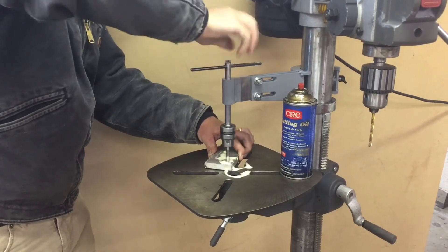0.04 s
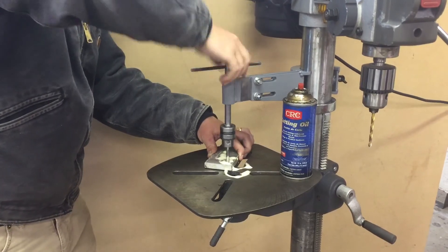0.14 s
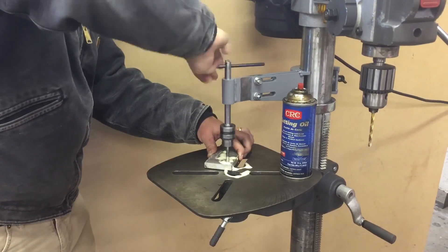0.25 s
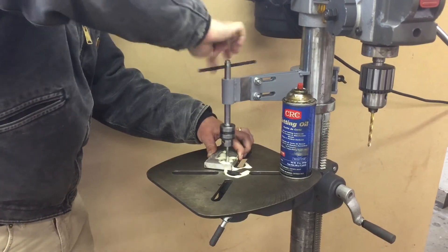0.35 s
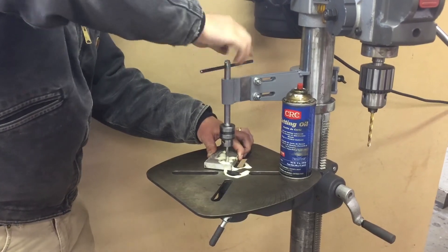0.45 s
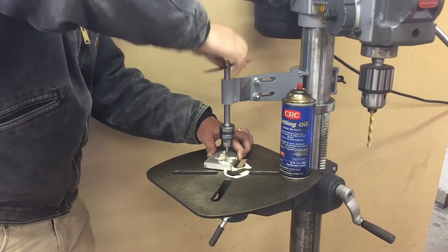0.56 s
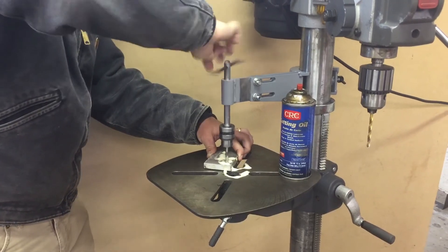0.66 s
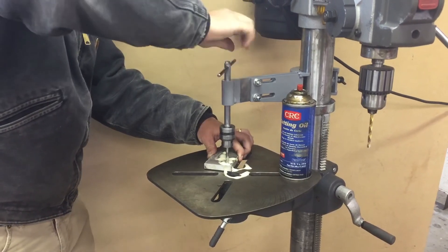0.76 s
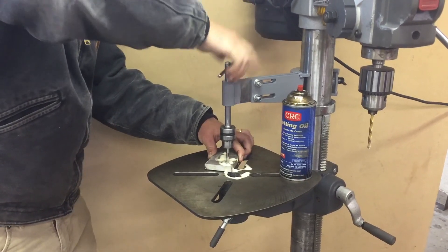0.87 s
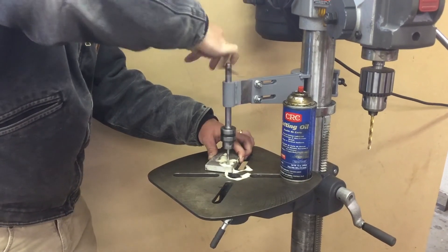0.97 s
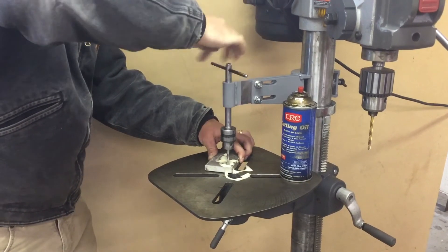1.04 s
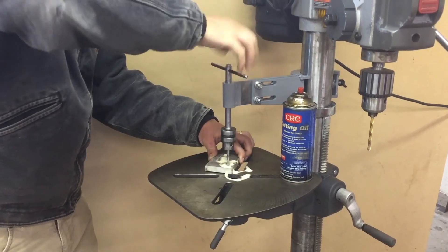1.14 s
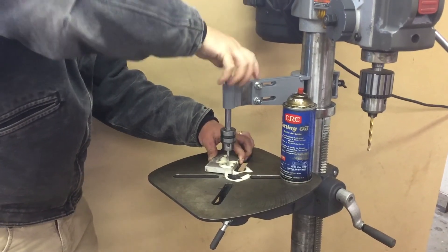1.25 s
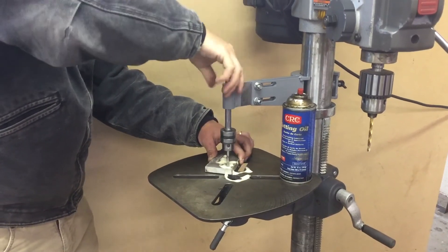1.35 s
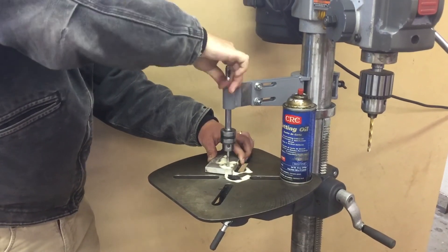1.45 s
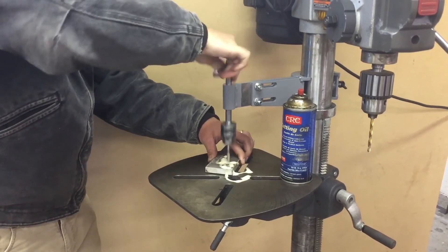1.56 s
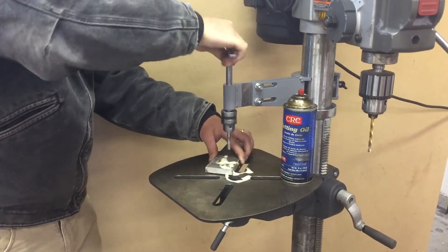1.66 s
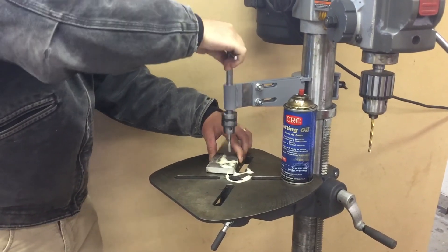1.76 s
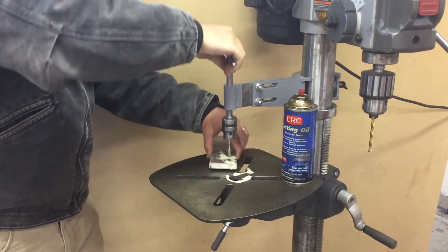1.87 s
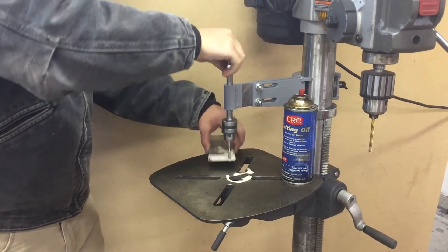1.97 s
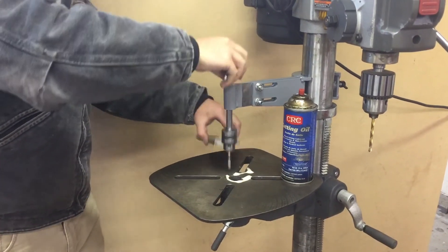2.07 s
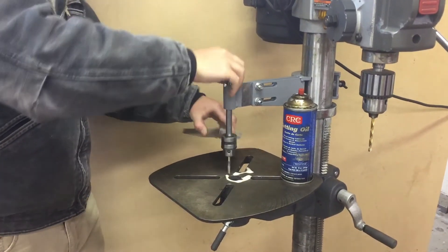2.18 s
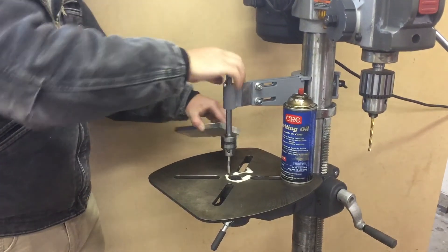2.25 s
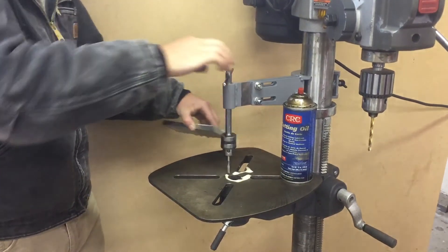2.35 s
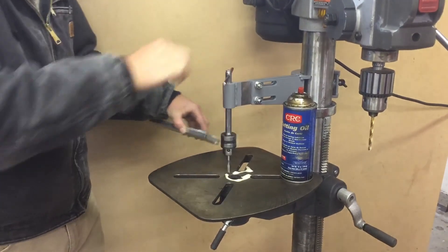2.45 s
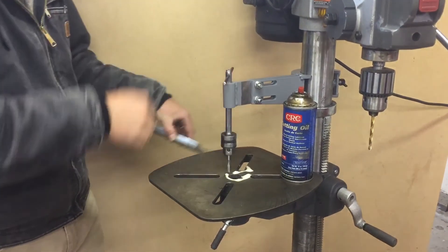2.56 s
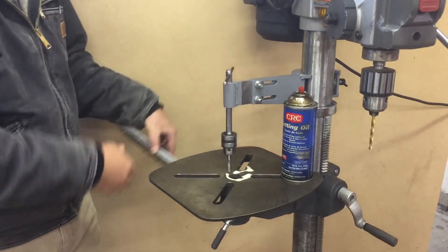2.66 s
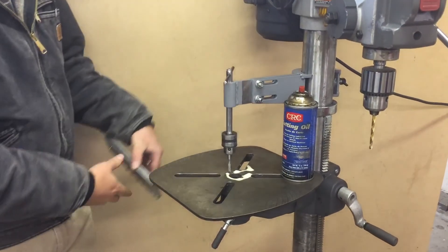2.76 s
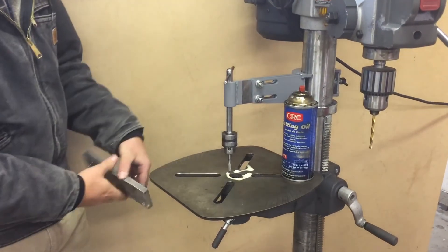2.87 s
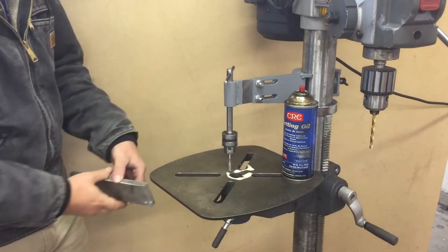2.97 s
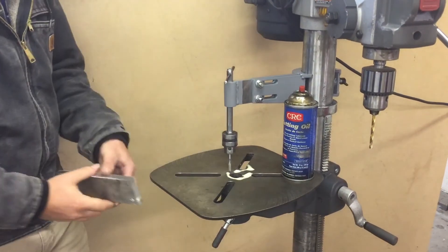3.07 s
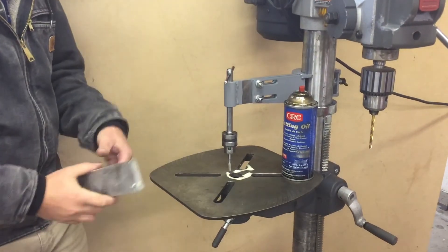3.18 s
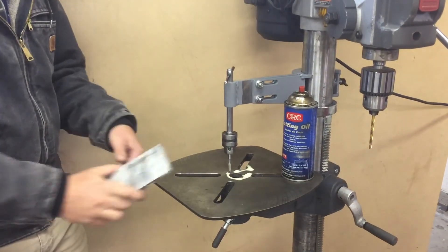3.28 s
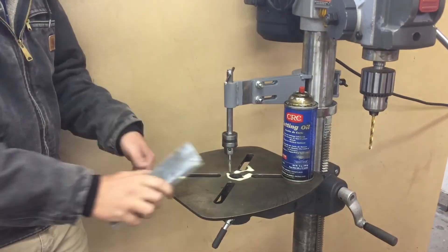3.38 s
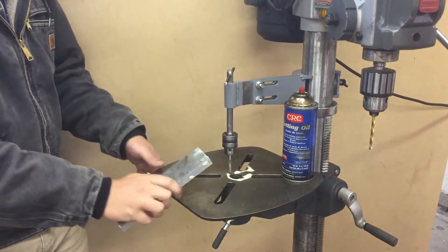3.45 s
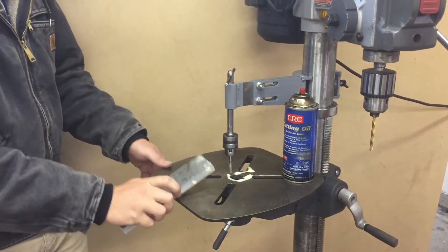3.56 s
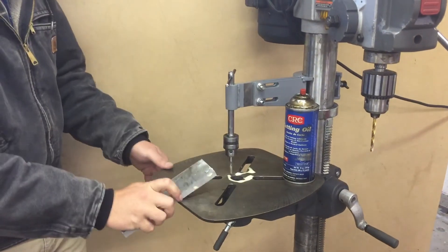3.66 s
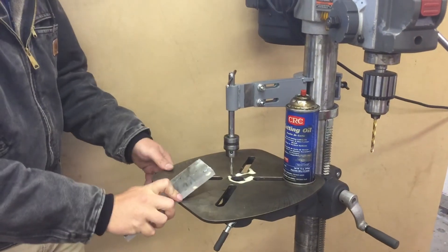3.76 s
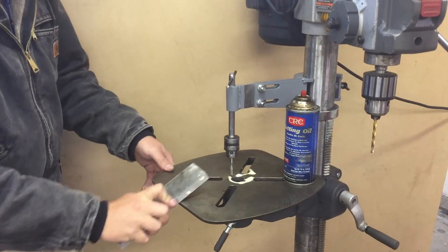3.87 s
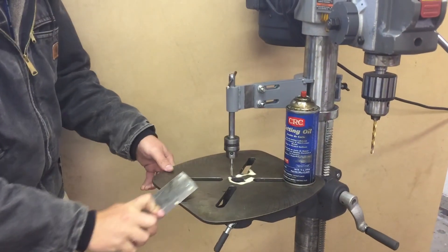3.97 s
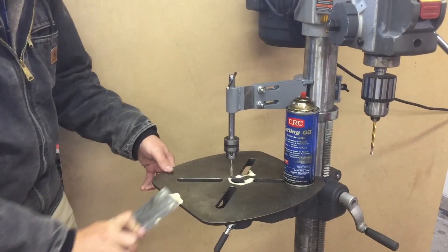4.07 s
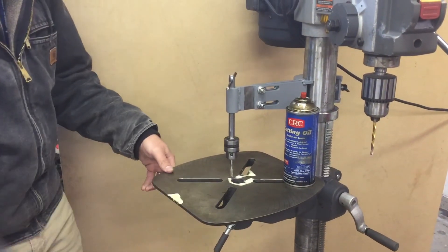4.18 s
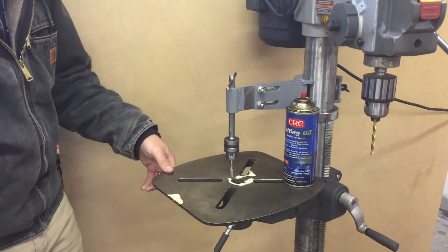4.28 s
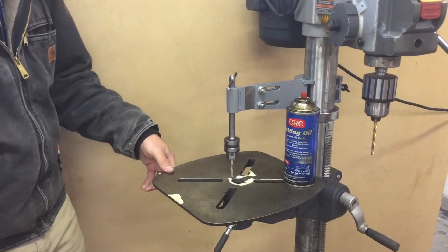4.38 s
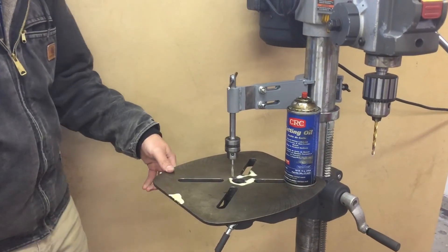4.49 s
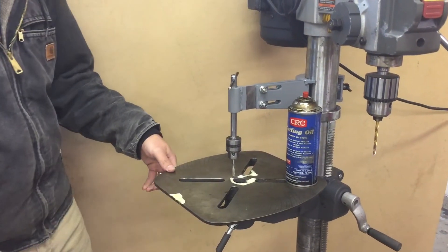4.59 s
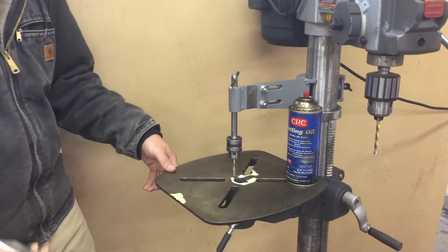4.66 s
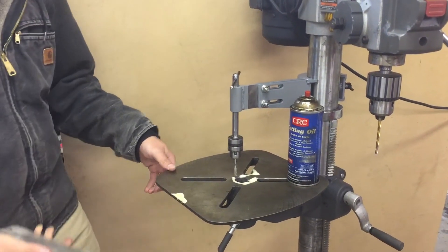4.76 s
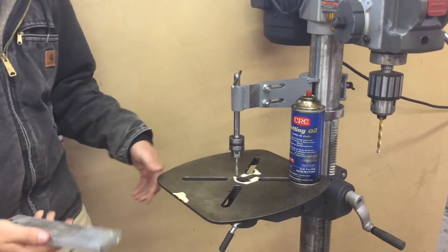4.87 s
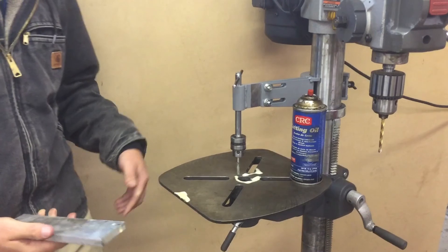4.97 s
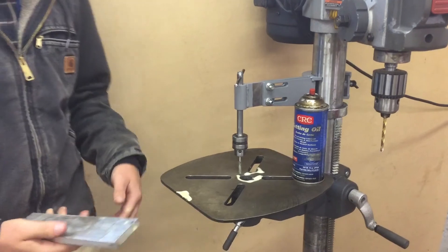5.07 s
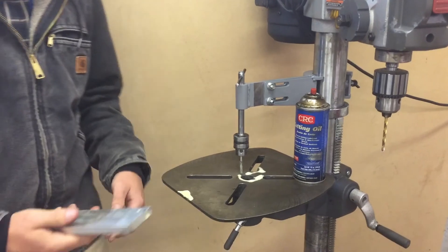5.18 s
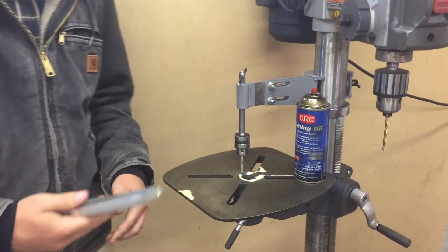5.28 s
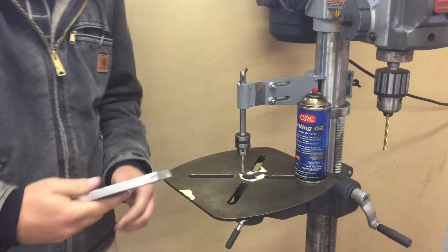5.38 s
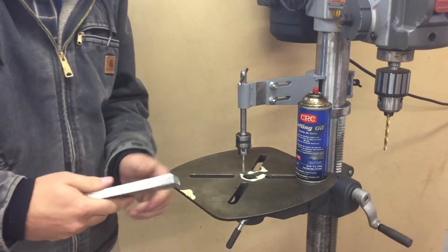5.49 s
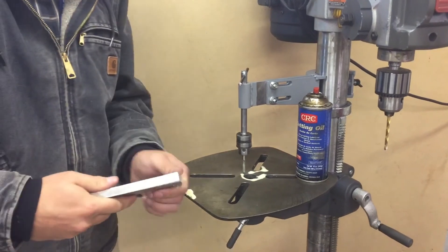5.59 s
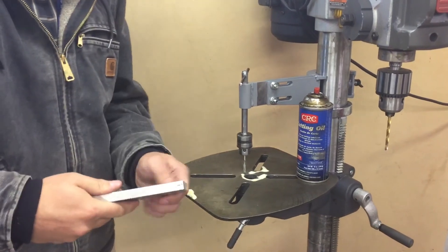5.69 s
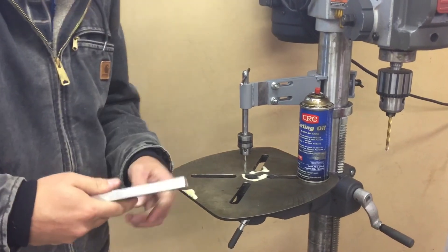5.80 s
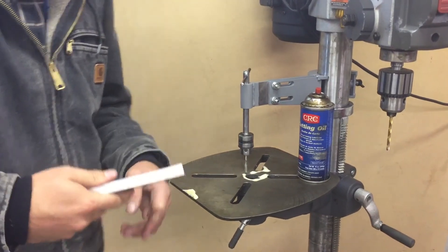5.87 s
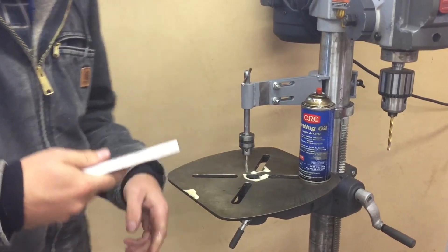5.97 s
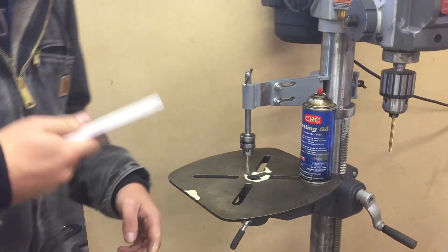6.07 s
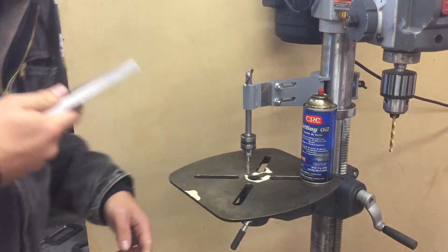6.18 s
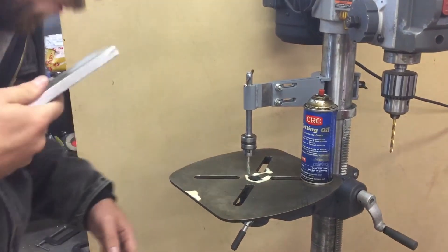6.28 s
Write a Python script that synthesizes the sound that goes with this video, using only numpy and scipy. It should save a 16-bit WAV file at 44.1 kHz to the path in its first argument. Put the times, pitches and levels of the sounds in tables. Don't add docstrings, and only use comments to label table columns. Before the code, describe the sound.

In a small hard workshop with faint low hum, a hand tap turns out of an aluminium plate in short gritty rasps. The tap guide clacks hard in a quick cluster, and the plate knocks the steel table. After quiet handling, its edge drops with a bright bouncing clatter and scrapes strongly. Soft palm rubs and small knocks finish it. One camera microphone, fairly close.

```python
import sys
import numpy as np
from scipy import signal
from scipy.fft import rfft, irfft
from scipy.io import wavfile
from scipy.ndimage import uniform_filter1d

SR = 44100
rng = np.random.default_rng(int(sys.argv[2]) if len(sys.argv) > 2 else 0)


def ratio_of_db(decibels):
    return 10 ** (np.asarray(decibels, float) / 20)


def dump_mix(stems):
    frames = np.atleast_2d(stems).T
    limited = np.clip(frames, -1, 1)
    pcm = np.round(limited * 32767).astype(np.int16)
    wavfile.write(sys.argv[1], SR, pcm)


N = 279278

# full contact in seconds, rise in seconds, hold in seconds,
# effort in dB, brightness in dB.
TURNS = [
    (.276, 0.05, 0.016, -35.5, 5.5),
    (.615, 0.003, 0.083, -38, -8),
    (.68, 0.13, 0.035, -50.5, 14.5),
    (.984, .025, 0.032, -46, 0.5),
    (1.03, 0.07, .025, -43, 4),
    (1.056, 0.02, 0.048, -44, -13),
    (1.589, .012, .01, -51, 0),
    (1.62, 0.045, 0.06, -31.5, 9),
    (1.685, .04, .033, -42.5, 6),
]
SLIDES = [
    (1.762, .004, .006, -33, 4),
    (2.195, 0.29, 0.013, -44.5, -12),
    (3.664, 0.03, 0.018, -53, -6),
    (3.96, 0.14, 0.06, -26, 0),
    (4.04, 0.047, 0.16, -26, 0.5),
]
COASTS = [
    (1.786, 0.0078, 0.13, -43, 6.5),
    (2.07, 0.026, 0.09, -50, -15),
    (3.73, .004, 0.37, -55, 10),
]
RUBS = [(2.892, 0.114, 0.0012, -63.5, 3), (3.074, 0.31, 0.063, -51.5, -2.5),
        (3.148, 0.27, 0.0066, -50.5, 0), (4.794, 0.024, 0.023, -64.5, 4), (5.087, 0.01, 0.022, -54, 3),
        (5.121, 0.079, 0.0034, -45.5, -1.5), (5.785, 0.046, 0.0622, -68, 15),
        (5.875, 0.18, 0.049, -55, 5.5), (5.955, 0.011, 0.011, -60.5, 0), (6.235, .03, .02, -67.5, 6),
        (6.272, 0.085, 0.011, -45.5, 2.5), (6.33, 0.092, .004, -32.5, 0.5)]
BRUSHES = [
    (2.466, 0.051, 0.27, -58, -17),
    (2.712, 0.046, 0.09, -68, 1),
    (5.574, 0.64, 0.0052, -56.5, 1.5),
]
# rise in dB, sag in dB per second while held, release in dB per
# second, weight (bass) in dB, weight gained in dB per dB of lost effort.
TURNING = (29.5, 136, 549, -6, 1.1442)
SLIDING = (30.5, 5, 909.5, -19.5, 0.5)
COASTING = (40, 42.5, 211, -5, 0.9052)
RUBBING = (41.5, 2, 698, 0.5, -0.09)
BRUSHING = (32.3, 37, 98, 5.5, 0.09)

# pitch in Hz, width in Hz, level in dB.
TAP = [(71, -59.5), (120, -45), (157, -33.5), (231, -15.5), (605, -5), (670, -12), (874, -19), (1090, -13),
       (2380, -7), (6110, -30), (16000, -59.5)]
TAP_PEAKS = [(165, 40, -6), (673, 60, -1), (1100, 190, -9), (1850, 200, -4), (2100, 120, -5),
             (2900, 200, -4), (3880, 250, -10), (4410, 150, -15)]
TABLE = [(71, -73.5), (120, -19.5), (483, 4), (535, -2), (930, -6.5), (1900, -7), (2640, -13), (2870, -8.5),
         (4880, -16.5), (13600, -39.5), (16000, -40.5)]
TABLE_PEAKS = [(931, 200, -6), (1480, 40, -9), (1700, 90, -8), (1880, 55, -2), (2450, 70, -5),
               (2790, 45, -5), (3270, 70, -7), (4410, 80, -15), (5100, 34, -15), (5300, 48, -11),
               (5980, 90, -16), (6910, 28, -20), (8120, 40, -21), (8480, 90, -19)]
SKIN = [(120, -94), (200, -10.5), (509, -8), (659, -3.5), (1270, -6.5), (1770, -2), (2960, -6),
        (3430, -3.5), (10500, -17), (15100, -21), (16000, -16)]
SKIN_PEAKS = [(660, 160, -10), (1800, 250, -11), (3440, 300, -11)]
# start in seconds, end in seconds, from Hz, to Hz, dB over the stroke.
SINGS = [(3.905, 3.99, 3480, 3400, -3), (3.92, 4.02, 1870, 1870, -5), (3.985, 4.085, 1720, 1450, -4),
         (4.035, 4.115, 2800, 2790, -6), (4.065, 4.185, 3350, 3050, -3), (4.0, 4.1, 2480, 2480, -9),
         (4.03, 4.105, 1000, 1250, -9), (4.125, 4.165, 1890, 1890, -2), (4.12, 4.235, 4600, 4250, -2),
         (3.94, 4.03, 520, 450, -7), (4.15, 4.21, 560, 420, -6)]
PALM_HOLLOWS = [
    (3.001, 3.202, 3000, 2416, -22),
    (5.045, 5.133, 1500, 750, 3),
    (5.78, 5.85, 1900, 1650, 4),
    (5.78, 5.84, 3150, 2950, 3),
    (5.83, 5.935, 2200, 1350, 4),
    (5.84, 5.93, 900, 600, 5),
    (5.875, 5.925, 2400, 3300, 1),
    (6.255, 6.34, 600, 1100, 4),
]

# start in seconds, crack in dB, contact chatter in seconds, ring in dB over the crack.
CLACKS = [(1.0235, -29, 0.003, 3), (1.0554, -39, .004, 1.5), (1.6192, -28, .006, -6.5),
          (1.7185, -8.5, 0.003, -14), (1.72, -7, 0.004, -6), (1.7248, -7.5, 0.004, -3),
          (1.733, -13, .005, -14.5), (1.7444, -23, 0.004, -3.5), (1.755, -19.5, .004, 4.5),
          (1.763, -22.5, .004, -11.5), (1.808, -33, .005, -4)]
RATTLES = [
    (1.7178, -9, 0.004, .1),
    (1.761, -46.5, .006, 3.6),
    (1.79, -42, .006, 6.1),
    (1.881, -42, 0.012, 5),
    (1.894, -42, 0.012, 5),
]
STEEL_HITS = [
    (1.72, -33, 0.0014, 3.4),
    (1.8811, -42, .004, 9.2),
    (1.8931, -40, 0.0051, 11.5),
    (3.7, -31, .002, 14),
    (4.195, -33.5, 0.0029, 1),
]
KNOCKS = [
    (.615, -46, 0.017, 7),
    (2.2045, -21, 0.012, 14),
    (2.212, -12, 0.015, -21),
    (2.222, -13, 0.0088, 0),
    (2.236, -18, 0.011, -2.5),
    (5.086, -52, 0.0042, 17),
    (5.117, -47.5, 0.0077, 5),
    (6.2635, -34.5, 0.0078, -14),
    (6.321, -26.5, 0.016, 7.5),
]
DROPS = [
    (3.6845, -9.5, 0.012, -6.5),
    (3.693, -8, 0.008, 3),
    (3.701, -7, 0.006, -2),
    (3.711, -17.5, 0.0041, -2.5),
    (3.732, -28, .004, -3),
    (3.747, -26.5, .004, -4),
]
SNAGS = [(.2498, -44, .003, -10), (.2563, -40, .003, -10), (.2618, -36, .004, -10), (.2733, -29, .003, -10),
         (.2855, -31, .003, -10), (.291, -31, .003, -10), (.3, -31, .002, -10), (.9662, -48, .004, -5),
         (.9841, -44, .003, -10), (.9931, -38, .003, -10), (3.9248, -30, .004, -10),
         (3.9457, -26, .004, -10)]

# pitch in Hz, level in dB, fade by 60 dB in seconds.
GUIDE = [(377, -13, .4), (571, -14, .3), (818, -16, .39), (1157, -13, .28), (1992, -18, .4),
         (2083, -13, .17), (2239, -6, .07), (2988, -8, .17), (3117, -8, .22), (3440, -13, .4),
         (3800, -6, .1), (4274, -9, .22), (5329, -18, .2)]
HANDLE = [(3450, -6, .3), (4400, -4, .15), (6250, -7, .15), (8500, -8, .12), (9808, -6, .2),
          (10750, -6, .24), (12100, -14, .1), (13840, -10, .1)]
STEEL = [(668, -3, .45), (1593, -8, .6), (1712, -6, .45), (1880, -4, .5), (2510, -9, .35), (2789, -4, .3),
         (3445, -4, .45), (4312, -15, .5), (4380, -15, .4)]
PLATE = [(296, -14, 0.4), (554, -4, 0.3), (668, -3, 0.3), (860, -3, 0.25), (942, -14, .2), (1195, -5, 0.22),
         (1513, -6, 0.55), (1798, 2, 0.32), (1879, -13, 0.35), (2094, -8, 0.2), (2476, -9, 0.23),
         (2785, -3, 0.28), (2891, -8, 0.2), (2982, -16, 0.3)]
EDGE = [(377, -22, .6), (619, -15, .6), (1217, -8, .2), (1577, -13, .6), (1685, -3, .12), (1852, -8, .4),
        (2510, -10, .5), (2810, -2, .3), (2993, -10, .5), (3461, -4, .25), (4307, -3, .3), (5206, -14, .3),
        (6293, -14, .25), (8150, -20, .3)]
# pitch in Hz, level in dB per Hz.
GUIDE_CRACK = [(88, -38.5), (150, -13), (570, -10.5), (2250, -1.5), (2740, -1), (3750, 0.5), (6130, -6),
               (7920, -14.5), (11100, -13), (14300, -16.5), (16400, -40.5)]
PLATE_CRACK = [(88, -38), (150, -14), (400, -6), (913, 1), (1820, -3.5), (2040, -7.5), (2850, -5),
               (4940, -17.5), (13700, -31), (15400, -28.5), (16400, -67)]
EDGE_CRACK = [(88, -70), (150, -27), (1070, -13.5), (1220, -3), (1460, -25), (1680, 1), (2200, -13),
              (2800, -1), (3150, -11), (3470, 0), (3900, -19), (4390, -8), (4850, -24), (8400, -27),
              (15100, -52), (16400, -74.5)]
SNAG_CRACK = [(300, -40), (1300, -18), (1900, 0), (2400, -5), (2900, 0), (3400, -6), (3900, -2),
              (5000, -16), (16000, -40)]

# start in seconds, peak in dB, pitch
# in Hz, width in Hz, fade by 60 dB in seconds.
TICKS = [(0, -53, 480, 300, 0.31), (4.2, -28.5, 653, 120, 0.15), (2.141, -40.5, 515, 330, 0.28),
         (.281, -36.5, 664.6, 35, 0.27), (.73, -51, 640, 220, .5), (.96, -48.5, 604, 380, 0.49),
         (1.08, -56, 657, 100, 0.58), (1.881, -39, 4400, 274, 0.096), (1.893, -41, 4316, 350, .07),
         (4.2, -36, 491, 90, 0.14), (1.735, -32.5, 477, 450, 0.14), (0.479, -55, 1060, 60, 0.08),
         (.614, -30, 1990, 160, 0.07), (.63, -42, 3000, 350, .12), (.262, -38, 2000, 200, .1),
         (1.024, -36, 6300, 500, 0.09), (1.0235, -36, 7000, 6000, .02), (1.3, -58.5, 680, 20, 0.48),
         (1.601, -46, 393, 78, 0.9), (1.62, -39, 7830, 3500, 0.053), (1.895, -47, 14000, 200, 0.09),
         (2.06, -49, 663, 75, 0.44), (2.845, -63, 4520, 80, 0.25), (2.888, -52, 12170, 7100, 0.022),
         (3.612, -54, 1614, 82, 0.068), (3.613, -65.5, 4380, 92, 0.071), (5.086, -46, 620, 150, 0.08),
         (5.108, -42, 850, 300, .08), (5.12, -47, 670, 60, .15), (2.243, -29, 1798, 30, .2),
         (2.21, -27, 556, 60, .25), (2.225, -24, 1150, 100, .08), (5.87, -52, 750, 300, .15),
         (1.15, -55, 380, 120, .4), (1.73, -37.5, 277.1, 110, 0.4), (1.8, -37, 518, 330, 0.3),
         (2.111, -47, 1243, 250, 0.29), (.275, -53, 8700, 770, 0.11), (.67, -56, 8700, 710, 0.11),
         (6.13, -52, 9020, 1960, 0.055), (4.791, -46, 3950, 5000, 0.042), (5.766, -49, 11000, 8000, 0.081),
         (5.955, -38, 1682, 3500, 0.043), (6.234, -46, 5490, 6000, 0.058)]
# start in seconds, stopped at seconds, pitch in Hz, level in dB.
STOPPED = [(5.13, 5.245, 670, -52), (2.25, 2.405, 672, -37), (2.32, 2.46, 1880, -48),
           (1.89, 2.01, 1593, -54), (1.9, 2.03, 668, -47), (.28, .31, 680, -38), (3.73, 3.86, 1712, -39),
           (3.74, 3.94, 3445, -45), (3.75, 3.88, 4317, -53), (3.74, 3.84, 614, -43),
           (1.89, 2.04, 3450, -52), (2.27, 2.5, 1513, -48), (.27, .5, 180, -55), (.5, .68, 182, -56),
           (1.76, 1.86, 10745, -54), (4.3, 4.43, 666, -55)]

# pitch in Hz, fade by 60 dB in seconds.
SHOP = [(200, 1), (530, 0.46), (1390, 0.48), (3680, 0.41), (9700, 0.23), (16000, 0.06)]
# time in seconds, level in dB.
HUM = [(0, -56), (.2, -61.5), (.4, -54.5), (.9, -64.5), (1.25, -64), (1.5, -54.5), (2.15, -52),
       (3.0, -54.5), (3.7, -59), (4.25, -58.5), (4.6, -70), (5.02, -76.5), (5.12, -61), (5.6, -59),
       (5.8, -60), (6.0, -66), (6.2, -55), (6.33, -69)]
# time in seconds, level in dB.
JOLTS = [(0.268, -49.5), (.45, -56), (.66, -49.5), (0.997, -46.5), (1.09, -49), (1.55, -60), (1.85, -48.5),
         (2.219, -50), (2.422, -53.5), (3.14, -61.5), (3.719, -69), (4.27, -54), (5.111, -62.5)]
# pitch in Hz, level in dB per Hz.
AIR = [(12, -50.5), (20, -32.5), (70, 10), (187, -17.5), (234, -1.5), (285, -8.5), (422, -13.5),
       (472, -16.5), (1190, -17), (1330, -18), (2990, -23), (3440, -24.5), (16000, -34)]
# pitch in Hz, width in Hz, depth in dB.
NOTCHES = [(4883, 120, -7.5), (10500, 280, -6)]

HUM_HZ, HUM_WANDER_DB = 78.6, 2.5
RUMBLE_DB, RUMBLE_FALL_DB_PER_S, RUMBLE_WANDER_DB = -62.5, 1.5, 2.5
COLUMN_HZ, COLUMN_REST_DB, JOLT_RISE_S, JOLT_T60_S = 166.1, -73, .03, 0.33
AIR_DB = -61
SHOP_DB, RING_WET_DB = -8, -10
GATE_DB, GATE_SLOPE = -43.5, 0.24
RING_PATCHY_DB = 2.5
STOPPED_FALL_DB_PER_S, STOPPED_WOBBLE = 50, .35


def evened(x):
    return x / np.sqrt(np.mean(x ** 2) + 1e-20)


def read(points, hz):
    f, value = np.transpose(points)
    return np.interp(np.log(hz + 1), np.log(f + 1), value)


def add(mix, s, sound):
    part = mix[round(s * SR):][:len(sound)]
    part += sound[:len(part)]


def band(x, hz, kind):
    return signal.sosfiltfilt(signal.butter(2, hz, kind, fs=SR, output="sos"), x)


def resonate(x, hz, width):
    r = np.exp(-np.pi * width / SR)
    poles = [1, -2 * r * np.cos(2 * np.pi * hz / SR), r * r]
    once = signal.lfilter([1], poles, x)
    return evened(signal.lfilter([1], poles, once))


def body(colour, peaks=(), lift_db=0, size=8192):
    hz = np.fft.rfftfreq(size, 1 / SR)
    power = ratio_of_db(read(colour, hz)) ** 2
    for f, width, db in peaks:
        power += ratio_of_db(db + lift_db) ** 2 / (1 + (2 * (hz - f) / width) ** 2) ** 2
    cepstrum = irfft(np.log(power + 1e-10) / 2)
    cepstrum[1:size // 2] *= 2
    taps = irfft(np.exp(rfft(cepstrum[:size // 2], size)))[:size // 2]
    return taps / np.linalg.norm(taps)


def patchy(x, patchy_db):
    z = signal.stft(x, nperseg=512, noverlap=384)[2]
    noise = rng.standard_normal(z.T.shape)
    patches = evened(uniform_filter1d(uniform_filter1d(noise, 12, 0), 4, 1)).T
    varied = signal.istft(z * ratio_of_db(patchy_db * patches), nperseg=512, noverlap=384)[1]
    return evened(varied[:N])


def friction(strokes, taps, per_s, spread_db, smooth, judder_db, patchy_db):
    slip, hiss = rng.random(N), rng.standard_normal(N)
    size, shake = rng.exponential(1, N), rng.standard_normal(N)
    clicks = np.sign(hiss) * (slip < per_s / SR) * ratio_of_db(spread_db * np.minimum(size, 3))
    slow_shake = uniform_filter1d(uniform_filter1d(shake, 300), 300)
    judder = ratio_of_db(judder_db * evened(slow_shake))
    contact = judder * (evened(clicks) + smooth * hiss)
    sound = patchy(signal.oaconvolve(contact, taps)[:N], patchy_db)
    top, low = band(sound, 4700, "high"), band(sound, 820, "low")
    out = np.zeros(N)
    for rows, (rise_db, sag_db, release_db, weight_db, heavier) in strokes:
        for s, rise, hold, effort_db, bright_db in rows:
            span = slice(max(round((s - rise) * SR), 0), round((s + hold + .4) * SR))
            t = np.arange(N)[span] / SR - s
            lost_db = rise_db * np.maximum(-t / rise, 0)
            lost_db += sag_db * np.clip(t, 0, hold)
            lost_db += release_db * np.maximum(t - hold, 0)
            heavy = ratio_of_db(weight_db + heavier * np.minimum(lost_db, 30) * (t > 0))
            shaped = sound[span] + (ratio_of_db(bright_db) - 1) * top[span] + (heavy - 1) * low[span]
            out[span] += ratio_of_db(effort_db - lost_db) * shaped
    return out


def gliding(x, rows, width):
    out, r = x.copy(), np.exp(-np.pi * width / SR)
    for start, end, from_hz, to_hz, db in rows:
        part = x[round(start * SR):round(end * SR)]
        turn = np.exp(2j * np.pi * np.cumsum(np.geomspace(from_hz, to_hz, len(part))) / SR)
        tone = (turn * signal.lfilter([1 - r], [1, -r], part / turn)).real
        add(out, start, ratio_of_db(db + 13) * signal.windows.tukey(len(part), .4) * tone)
    return out


def turning_tap():
    return friction([(TURNS, TURNING)], body(TAP, TAP_PEAKS, lift_db=-1.0), per_s=3000,
                    spread_db=0.5, smooth=0.54, judder_db=2.0, patchy_db=-1.0)


def sliding_plate():
    scrape = friction([(SLIDES, SLIDING), (COASTS, COASTING)], body(TABLE, TABLE_PEAKS, lift_db=3.5),
                      per_s=2500, spread_db=1.0, smooth=0.37, judder_db=1.0, patchy_db=1.4)
    return gliding(scrape, SINGS, width=110)


def rubbing_hands():
    rub = friction([(RUBS, RUBBING), (BRUSHES, BRUSHING)], body(SKIN, SKIN_PEAKS, lift_db=-7.5),
                   per_s=3300, spread_db=1.0, smooth=0.9, judder_db=1.0, patchy_db=1.5)
    return gliding(rub, PALM_HOLLOWS, width=280)


def blows(events, modes, crack, damping):
    chatter, push, t = np.zeros(N), np.zeros(N), np.arange(SR // 2) / SR
    early = t[:SR // 10]
    noises = rng.standard_normal((len(events), SR // 10))
    for (s, crack_db, lasts, ring_db), noise in zip(events, noises):
        shape = np.exp(-early / lasts) * np.minimum(early / 0.0004, 1)
        add(chatter, s, ratio_of_db(crack_db - 6.5) * noise * shape)
        add(push, s, ratio_of_db([crack_db - 16 + ring_db]))
    beat_hz = rng.uniform(20, 60, (len(modes), 1))
    beats = 1 + .3 * np.cos(2 * np.pi * beat_hz * t)
    ring = np.zeros(len(t))
    for beat, (hz, db, t60) in zip(beats, modes):
        fade = ratio_of_db(db - 60 * t / (damping * min(t60, .6)))
        ring += beat * fade * np.sin(2 * np.pi * hz * t)
    ring *= np.minimum(t / .001, 1) / np.sqrt(np.mean(ring[:SR // 50] ** 2))
    cracks = signal.oaconvolve(chatter, body(crack))[:N]
    return np.array([cracks, signal.oaconvolve(push, ring)[:N]])


def struck_metal():
    struck = blows(CLACKS, GUIDE, GUIDE_CRACK, damping=0.84)
    struck += blows(RATTLES, HANDLE, GUIDE_CRACK, damping=0.61)
    struck += blows(STEEL_HITS, STEEL, GUIDE_CRACK, damping=0.97)
    struck += blows(KNOCKS, PLATE, PLATE_CRACK, damping=1.0)
    struck += blows(DROPS, EDGE, EDGE_CRACK, damping=0.33)
    return struck


def snagging_chips():
    return blows(SNAGS, GUIDE, SNAG_CRACK, damping=.4).sum(0)


def palm_stopped_rings():
    out = np.zeros(N)
    noises = rng.standard_normal((len(STOPPED), SR // 4))
    for (start, end, hz, db), noise in zip(STOPPED, noises):
        t = np.arange(0, end - start, 1 / SR)
        slow = evened(uniform_filter1d(uniform_filter1d(noise, 500), 300))
        wobble = 1 + STOPPED_WOBBLE * slow[:len(t)]
        level = ratio_of_db(db - STOPPED_FALL_DB_PER_S * t) * signal.windows.tukey(len(t), .25)
        add(out, start, level * wobble * np.sin(2 * np.pi * hz * t))
    return out


def ticks():
    out, t = np.zeros(N), np.arange(SR // 4) / SR
    noises = rng.standard_normal((len(TICKS), SR // 4))
    for (s, db, hz, width, t60), noise in zip(TICKS, noises):
        flutter = evened(uniform_filter1d(noise, max(round(SR / width), 1)) + 40 / width)
        level = ratio_of_db(db - 60 * t / t60) * np.minimum(t / 0.0017, 1)
        add(out, s, level * flutter * np.sin(2 * np.pi * hz * t))
    return out


def shop(x, count=3):
    taps = np.zeros((count, SR))
    slots = np.arange(250, SR - 20, 20)
    at = slots + rng.integers(0, 20, (count, len(slots)))
    np.put_along_axis(taps, at, rng.choice([-1., 1.], at.shape), 1)
    hz, t, z = signal.stft(taps, SR, nperseg=256)
    fade = ratio_of_db(-60 * t / read(SHOP, hz)[:, None])
    tail = signal.istft(z * fade, SR, nperseg=256)[1]
    phase = np.arange(N) / SR * 4 + np.arange(count)[:, None] / count
    share = np.sqrt(2 / 3) * np.cos(np.pi * phase)
    return signal.fftconvolve(share * x, tail / np.linalg.norm(tail[0]), axes=1)[:, :N].sum(0)


def gated(x):
    level_db = 10 * np.log10(abs(uniform_filter1d(x ** 2, 1024)) + 1e-12)
    return x * ratio_of_db(GATE_SLOPE * np.minimum(level_db - GATE_DB, 0))


def hum():
    t = np.arange(N) / SR
    a, b, c, d, e = rng.standard_normal((5, N))
    turns = np.cumsum(HUM_HZ + 3.7 * resonate(a, 0.33, 2.5)) / SR
    tone = evened(np.sqrt(2) * np.sin(2 * np.pi * turns) + 0.21 * resonate(b, HUM_HZ, 30))
    tone_db = np.interp(t, *np.transpose(HUM)) + HUM_WANDER_DB * resonate(e[::-1], 3, 7.3)
    rumble_db = RUMBLE_DB - RUMBLE_FALL_DB_PER_S * t + RUMBLE_WANDER_DB * resonate(e, 1.5, 6.5)
    singing = ratio_of_db(COLUMN_REST_DB)
    for s, db in JOLTS:
        lost_db = np.where(t < s, 20 * (s - t) / JOLT_RISE_S, 60 * (t - s) / JOLT_T60_S)
        singing = singing + ratio_of_db(db - lost_db)
    rumble = ratio_of_db(rumble_db) * resonate(c, 55, 38)
    return ratio_of_db(tone_db) * tone + rumble + singing * resonate(d, COLUMN_HZ, 49)


def air():
    hiss = signal.oaconvolve(rng.standard_normal(N), body(AIR))[:N]
    return ratio_of_db(AIR_DB) * signal.sosfilt(signal.butter(2, 110, "high", fs=SR, output="sos"), hiss)


def scene():
    near = turning_tap() + sliding_plate() + rubbing_hands()
    cracks, rings = struck_metal()
    near += cracks + ticks() + snagging_chips()
    rings = np.std(rings) * patchy(rings, RING_PATCHY_DB) + palm_stopped_rings()
    echoes = ratio_of_db(SHOP_DB) * shop(near + ratio_of_db(RING_WET_DB) * rings)
    return (gated(near + rings + echoes) + hum() + air())[None]


def band_limit(x):
    return signal.sosfilt(signal.butter(12, 15830, fs=SR, output="sos"), x)


def record(dry):
    hz = np.fft.rfftfreq(N, 1 / SR)
    dips_db = sum(db / (1 + (2 * (hz - f) / width) ** 2) for f, width, db in NOTCHES)
    dipped = irfft(rfft(dry) * ratio_of_db(dips_db), N)
    mix = signal.sosfilt(signal.butter(6, 38, "high", fs=SR, output="sos"), dipped)
    return band_limit(mix)


dry = scene()
out = record(dry)
dump_mix(out)
```